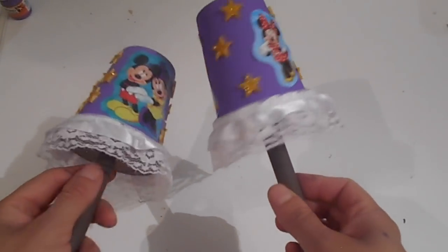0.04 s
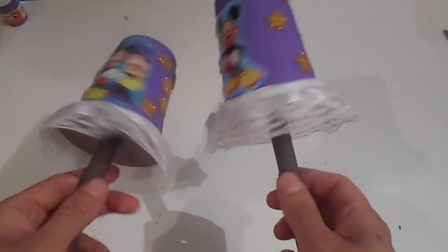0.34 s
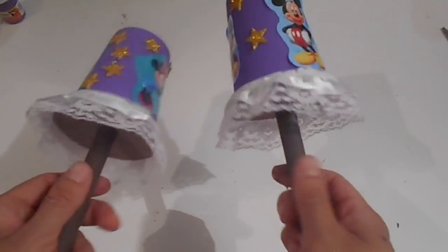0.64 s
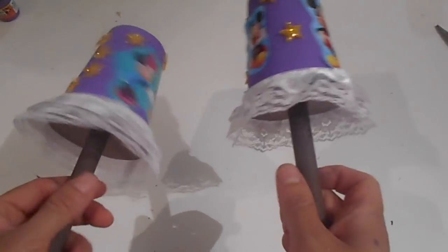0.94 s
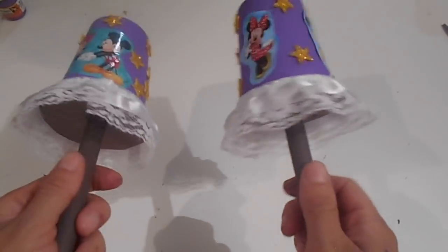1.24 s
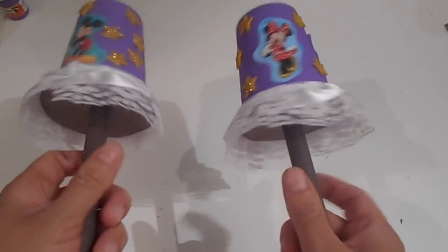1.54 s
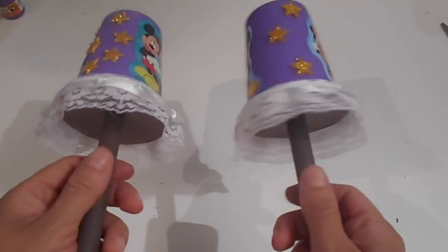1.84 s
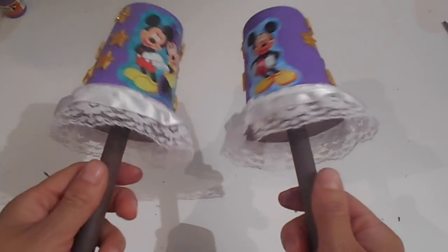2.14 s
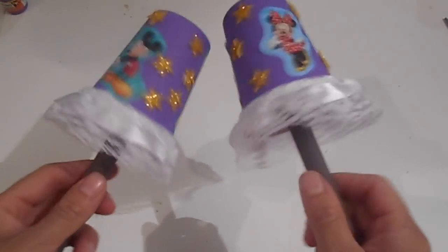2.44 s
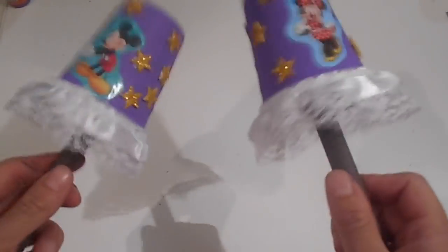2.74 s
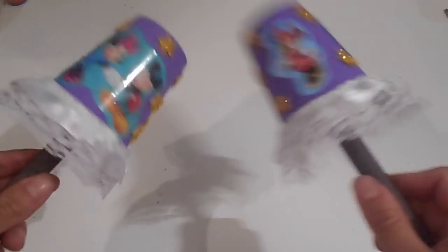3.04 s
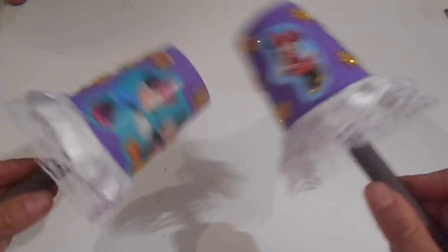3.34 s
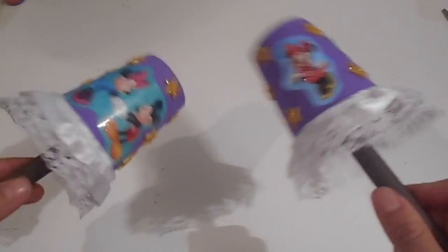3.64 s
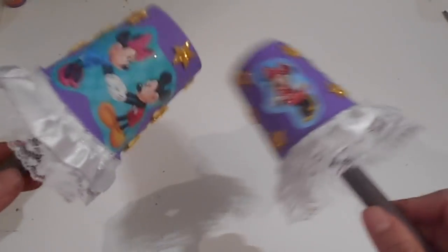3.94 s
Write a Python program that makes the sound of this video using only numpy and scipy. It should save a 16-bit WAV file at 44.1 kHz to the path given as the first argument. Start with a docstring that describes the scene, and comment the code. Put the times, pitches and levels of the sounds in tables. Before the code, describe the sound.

Two homemade maracas are turned close to the microphone, grains sliding and trickling inside the cups in uneven swishes with small hollow clacks. The sound thins briefly around 1 second and again around 2.3 seconds. At about 2.9 seconds a sharp knock starts harder shaking, and a quicker, louder rattle continues to about 4 seconds. The small, quiet room adds a short echo.

```python
"""Homemade maracas in a small room

Two cups on sticks, with loose grains inside, are played close to the microphone. Turned slowly at first,
the filling slides and trickles; from about 2.9 s they are shaken hard. Every grain ticks on the cup wall
and rings the air inside; single grains and clumps land with louder clacks. The room adds a short echo."""
import sys
import numpy as np
from scipy import signal
from scipy.fft import rfft, irfft
from scipy.io import wavfile
from scipy.ndimage import uniform_filter1d

SR = 44100
rng = np.random.default_rng(int(sys.argv[2]) if len(sys.argv) > 2 else 0)


def to_wav(s):
    """Save 16-bit WAV."""
    ch = np.atleast_2d(s).T  # columns
    pcm = np.round(np.clip(ch, -1, 1) * 32767)  # PCM
    wavfile.write(sys.argv[1], SR, pcm.astype(np.int16))


N = 176400
HZ = np.fft.rfftfreq(2048, 1 / SR)
HIT_LEN = len(HZ)  # samples in one impact
HIT_T = np.arange(HIT_LEN) / SR


def amp(db):
    """Decibels to gain."""
    return 10 ** (np.asarray(db) / 20)


def unit(x):
    """Scales each row to energy 1."""
    return x / np.sqrt(np.sum(x ** 2, -1, keepdims=True) + 1e-20)


def curve(points, hz):
    """Joins (Hz, value) points on a log-frequency axis."""
    point_hz, value = np.transpose(points)
    return np.interp(np.log(hz + 1), np.log(point_hz + 1), value)


def add(mix, start_s, sound):
    """Mixes a sound in at start_s, dropping what falls outside."""
    at = round(start_s * SR)
    sound = sound[max(-at, 0):]
    part = mix[max(at, 0):][:len(sound)]
    part += sound[:len(part)]


def causal(db):
    """Impulse response with the given gains on HZ and no ringing ahead."""
    log_gain = np.log(amp(np.r_[db, db[-2:0:-1]]))
    spectrum = np.exp(np.conj(signal.hilbert(log_gain)))
    return np.fft.ifft(spectrum).real[:HIT_LEN]


def ringing(modes):
    """One dying sine for each mode of a struck object."""
    return np.array([amp(db - 60 * HIT_T / t60) * np.sin(2 * np.pi * hz * HIT_T)
                     for hz, db, t60 in modes])


# The quiet room around the microphone. Each row: frequency in Hz, relative noise density in dB.
ROOM_TONE = [(20, -2.5), (50, -9.5), (85, -13.5), (120, -6.5), (165, 4.5), (230, -1), (400, -3.5),
             (550, -9.5), (1000, -5), (3000, -12.5), (7000, -13.5), (9500, -20), (10500, -64)]


def room_tone(rms_db=-56):
    """Faint steady noise behind the maracas."""
    colour = amp(curve(ROOM_TONE, np.fft.rfftfreq(N, 1 / SR)))
    noise = irfft(rfft(rng.standard_normal(N)) * colour, N)
    return amp(rms_db) * np.sqrt(N) * unit(noise)


# The colour of a grain on the cup, heard close up. Each row: frequency in Hz, relative gain in dB.
CUP_COLOUR = [(100, -45.5), (250, -37), (420, -18.5), (580, -19.5), (760, -10), (950, -3), (1400, -2),
              (1750, -2), (2650, -0.5), (3100, -5.5), (3500, -4), (4900, -2.5), (6600, -0.5), (7800, -3),
              (9100, -6.5), (9800, -15.5), (10500, -26.5)]
# The cup wall's modes. Each row: frequency in Hz, relative level in dB, seconds to fall 60 dB.
WALL_MODES = [(1065, -31, 0.014), (1444, -28.5, 0.033), (1687, -25, 0.046), (1980, -26.5, 0.028),
              (2270, -27, .025), (2690, -40, 0.016), (3500, -26, 0.026), (4230, -34.5, 0.02),
              (6170, -25, 0.02), (6750, -28.5, .012)]
CHATTER = amp(-18.5) * np.exp(-HIT_T / 0.01)  # the wall chatters briefly after each contact


def wall_ticks(count, contact_s=0.00025, ping_decay_cycles=3.46, ping_db=-7.5):
    """One tick for each spot on the wall: a sharp contact, its own mix of the modes and its own ping."""
    contact = rng.standard_normal((count, HIT_LEN)) * (np.exp(-HIT_T / contact_s) + CHATTER)
    ring = rng.standard_normal((count, len(WALL_MODES))) @ ringing(WALL_MODES)
    ping_hz = np.geomspace(945, 8710, count)
    cycles = ping_hz[:, None] * HIT_T
    ping = np.sin(2 * np.pi * cycles) * np.exp(-cycles / ping_decay_cycles)
    ticks = unit(contact + ring) + amp(ping_db) * unit(ping)
    return unit(signal.fftconvolve(ticks, causal(curve(CUP_COLOUR, HZ))[None], axes=1)[:, :HIT_LEN])


def cavity(sound, body_db, treble_db, air_hz, air_width_hz=125, air_db=2.5, body_trim_db=-3):
    """The air in the cup rings at a pitch that shifts with the filling; body and treble tint the blow."""
    body = curve([(650, 0), (950, 1), (1500, 1), (2700, 0)], HZ)
    treble = curve([(3400, 0), (6000, 1)], HZ)
    air = 1 / (1 + (2 * (HZ - air_hz) / air_width_hz) ** 2)
    colour_db = (body_db + body_trim_db) * body + treble_db * treble + air_db * air
    return signal.fftconvolve(sound, causal(colour_db))


def pop(hz, decay_s=0.0017):
    """One hollow pop: the air in the cup swells into its ring and dies within milliseconds."""
    return (HIT_T / decay_s) ** 2 * np.exp(-HIT_T / decay_s) * np.sin(2 * np.pi * hz * HIT_T)


def scattered_pops(swell, air_hz, chance, per_s=70, spread_oct=0.17, gain_db=6):
    """Heavier grains set the air in the cup popping around its own pitch."""
    out = np.zeros(len(swell) + HIT_LEN)
    count = int(len(swell) * per_s / SR)
    for k, (jitter, pitch, size) in enumerate(chance.random((count, 3))):
        at = int((k + jitter) * SR / per_s)
        hz = air_hz * 2 ** (spread_oct * (2 * pitch - 1))
        out[at:at + HIT_LEN] += amp(gain_db) * swell[at] * size * pop(hz)
    return out


def shower(ticks, t, swell, air_hz, shaken, usual_db=-28, crowding=0.6, bunch_hz=91, bunch_db=1.58):
    """Grains rain on the wall in bunches: fine and dense when sliding, coarser when shaken."""
    usual_per_s, spread_db, trim_db = (650, 3, 0.5) if shaken else (1700, 5.5, -0.5)
    chance = np.random.default_rng(rng.integers(2 ** 31))
    rate = usual_per_s / SR * (swell / amp(usual_db)) ** crowding  # louder surges hold more impacts
    due = np.cumsum(rate)
    bunches = chance.standard_normal(size=80)
    jitter, weight, spot = chance.random((int(due[-1]) + 1, 3)).T
    turn = np.arange(len(jitter)) + 2 * jitter - 1
    hits = np.minimum(np.searchsorted(due, turn), len(t) - 1)
    size = amp(spread_db * np.sqrt(12) * weight)
    size *= amp(bunch_db * np.interp(t[hits] * bunch_hz, np.arange(-40, 40), bunches))
    size *= swell[hits] / np.sqrt(rate[hits] * np.mean(size ** 2))  # together they follow the swell
    out = scattered_pops(swell, air_hz, chance)
    for at, strength, k in zip(hits, size, (spot * len(ticks)).astype(int)):
        out[at:at + HIT_LEN] += strength * ticks[k]
    return amp(trim_db) * out


# The filling surges against the wall, close to the microphone. Each row: peak time, rise and fall in
# seconds, relative level, hollow body and treble in dB, air resonance in Hz.
FILLING_SURGES = [(0.003, 0.06, 0.056, -39.5, -0.5, 3, 1070), (0.112, 0.11, 0.026, -32.5, 1.5, -1.5, 1150),
                  (0.187, 0.048, 0.065, -39, -3, -1.5, 1200), (0.29, 0.023, 0.034, -38, 6.5, -3.5, 1220),
                  (0.36, 0.059, 0.094, -32, 0, -5, 1320), (0.513, 0.06, 0.09, -32, 4, -5, 1265),
                  (0.63, 0.11, 0.039, -27, 1.5, -2.5, 1096), (0.685, 0.026, 0.04, -31.5, 6, -6, 1080),
                  (0.74, 0.031, 0.056, -34, 4, -8.5, 1130), (0.79, 0.014, 0.031, -37.5, 1.5, -6, 1120),
                  (1.154, 0.062, 0.049, -28.5, 4.5, -4, 1080), (1.199, 0.03, 0.1, -28, 4, -4.5, 1080),
                  (1.327, 0.044, 0.071, -29, 6, -5, 1310), (1.429, 0.019, 0.04, -36, 0.5, -1.5, 1410),
                  (1.527, 0.076, 0.053, -38, -2.5, -3.5, 1450), (1.689, 0.059, 0.04, -32.5, 1.5, -3, 1210),
                  (1.82, 0.023, 0.084, -40.5, 5.5, -1.5, 1550), (1.94, 0.052, 0.031, -29.5, 6, -3, 1363),
                  (1.995, 0.019, 0.079, -26.5, 2.5, -2, 1200), (2.1, 0.047, 0.11, -40, 0.5, -3, 1056),
                  (2.499, 0.042, 0.04, -28.5, 0.5, -7, 1260), (2.544, 0.03, 0.055, -34, 6.5, 0.5, 1304),
                  (2.678, 0.059, 0.066, -25.5, 0, -0.5, 1286), (2.907, 0.0087, 0.009, -26, 3, -2, 1420),
                  (2.959, 0.025, 0.058, -18.5, -1, 1, 982), (3.092, 0.013, 0.042, -29, 2, -2, 1450),
                  (3.14, 0.035, 0.035, -27.5, -4.5, 3, 1220), (3.202, 0.04, 0.02, -21.5, -1.5, 3, 944),
                  (3.245, 0.025, 0.02, -32, 3.5, -2.5, 1000), (3.295, 0.028, 0.048, -26.5, -0.5, 1.5, 1056),
                  (3.393, 0.04, 0.05, -25.5, -1, 1.5, 1000), (3.449, 0.014, 0.025, -38, 3, -10, 990),
                  (3.525, 0.059, 0.047, -32, 0.5, 1.5, 974), (3.604, 0.059, 0.044, -25, 0, 0, 1430),
                  (3.705, 0.023, 0.043, -35, 3.5, 1.5, 1016), (3.78, 0.085, 0.059, -27, -1.5, 0.5, 1000),
                  (3.885, 0.021, 0.041, -31, -2.5, -1.5, 1140), (3.94, 0.041, 0.066, -25.5, -2.5, 2, 1300),
                  (3.996, 0.022, 0.036, -27, -1, -5, 1130)]


def surges(shake_from_s=2.85, drop_db=12, roundness=1.5):
    """Each turn or shake sends a shower of grains that swells and thins."""
    out, ticks = np.zeros(N), wall_ticks(count=300)
    for peak_s, rise_s, fall_s, level_db, body_db, treble_db, air_hz in FILLING_SURGES:
        t = np.arange(-2 * rise_s, 2 * fall_s, 1 / SR)
        swell = amp(level_db - drop_db * np.maximum(-t / rise_s, t / fall_s) ** roundness)
        grains = shower(ticks, t, swell, air_hz, shaken=peak_s > shake_from_s)
        add(out, peak_s + t[0], cavity(grains, body_db, treble_db, air_hz))
    return out


def clack(rise_s=0.00022, decay_s=0.0013, ripple_db=3.5, ripple_width_hz=447.4):
    """A clump of grains lands at once: a short burst that rings the wall, coloured by the spot it hits."""
    fade = (1 - np.exp(-HIT_T / rise_s)) * (np.exp(-HIT_T / decay_s) + CHATTER)
    burst = rng.standard_normal(HIT_LEN) * fade
    for _ in range(3):  # even out the spectrum, then restore the fade
        burst = irfft(np.exp(1j * np.angle(rfft(burst))), HIT_LEN)
        burst *= fade / np.sqrt(abs(uniform_filter1d(burst ** 2, size=40)) + 1e-12)
    ring = sum(rng.choice([-1, 1]) * mode for mode in ringing(WALL_MODES))
    ripple = np.diff(rng.standard_normal(size=80)) / np.sqrt(2)
    spot_db = ripple_db * np.interp(HZ / ripple_width_hz, np.arange(len(ripple)), ripple)
    return unit(signal.fftconvolve(burst + ring, causal(curve(CUP_COLOUR, HZ) + spot_db)))


# Hard landings that stand out at close range. Each row: start in seconds, relative level, hollow body
# and treble in dB, air resonance in Hz.
HARD_LANDINGS = [(0.036, -37.5, 8, 5, 1066), (0.1754, -26.5, -10, 3.5, 1210),
                 (0.1861, -24, -3.5, -12, 1180), (0.224, -45.5, 9, 3, 1450), (0.325, -37, 12, -14, 1320),
                 (0.3512, -32.5, 9, -24, 1350), (0.4651, -27.5, 1.5, -9.5, 1280),
                 (0.492, -24.5, -17, -12, 1010), (0.506, -34, 7, -14, 1100), (0.611, -25.5, -2, -11, 1200),
                 (0.6335, -22, -1.5, -8, 1400), (0.676, -30.5, 9, -8, 1060),
                 (0.6804, -20.5, -3, -9.5, 1050), (0.7102, -26.5, -22, -2.5, 1240),
                 (0.7227, -26.5, 8.5, -10, 1110), (0.7556, -25.5, -4, -6, 1080), (0.7826, -29, 6, -9, 1155),
                 (0.889, -34.5, 6, -3.5, 1576), (0.907, -36.5, -4, 0, 1430), (1.064, -53, -2, -14, 1200),
                 (1.153, -45, 10, -30, 1094), (1.2944, -22.5, 10, -6, 984), (1.3174, -27, 9.5, -10, 960),
                 (1.3349, -21.5, 8, 0.5, 1360), (1.4152, -29, 11, -4, 1480), (1.427, -24.5, -1, 4, 1083),
                 (1.4644, -40, 7, 8, 1180), (1.4958, -35.5, 5, -1, 1470), (1.5261, -32.5, 14.5, -29, 1470),
                 (1.5435, -43.5, 16, 8, 1420), (1.5862, -48.5, 13, 7, 1430), (1.817, -32, -7, -12, 1400),
                 (1.826, -29.5, 0, -7, 1370), (1.912, -29, 6, -21, 1340), (1.9479, -26.5, -18, -1, 1340),
                 (1.9762, -24, 1, -6, 1260), (2.0252, -31, 4, 9.5, 1200),
                 (2.0762, -24.5, -12.5, -7.5, 1490), (2.0902, -23, -14, -13, 1040),
                 (2.1592, -33.5, -13, -1, 1150), (2.2026, -28, -13, -10.5, 1460),
                 (2.2167, -34, 5.5, -6, 1080), (2.4896, -28, 6.5, -19, 1230), (2.508, -29.5, -6, -4, 1250),
                 (2.6293, -32, -12, 0, 1480), (2.6613, -30, 2, 8.5, 1420), (2.682, -26, 4, 4, 1184),
                 (2.7505, -26, -8, -11, 1480), (2.7723, -33, -10, -5, 1080), (2.7883, -31, 5, -13, 1220),
                 (2.8735, -33.5, -3, -10, 1480), (2.9022, -23, 2, 2, 1430), (2.9398, -21.5, -18, 6.5, 1240),
                 (3.0284, -22.5, -0.5, -7, 1030), (3.0746, -24.5, -18, -10.5, 1260),
                 (3.0997, -23, -8, -1, 1390), (3.1044, -22, -23, -1, 1460), (3.124, -27.5, -13, 4, 1090),
                 (3.1684, -25, -13, 3, 950), (3.211, -28.5, 9, -16, 1010), (3.229, -30.5, 4.5, -7, 1120),
                 (3.243, -30, 4, -9, 1260), (3.2678, -21, -17, -2.5, 1110), (3.2749, -22.5, -4, 0, 1280),
                 (3.278, -32.5, -3, 14.5, 1030), (3.3296, -30, 2, 3, 1470), (3.3625, -35, -4.5, 3, 1090),
                 (3.461, -27, -18, -2.5, 1180), (3.476, -32, -9, -1, 1200), (3.4924, -28.5, 2.5, 6.5, 1490),
                 (3.564, -22.5, -18, -1.5, 1290), (3.617, -29, 2, 7.5, 1100), (3.6852, -25, -17, -2, 1060),
                 (3.8703, -21, -10, -9.5, 1370)]


def landings(gain_db=24, pop_db=-15):
    """Single clacks among the surges, each with its hollow pop."""
    out = np.zeros(N)
    for start_s, level_db, body_db, treble_db, air_hz in HARD_LANDINGS:
        landing = clack()[:HIT_LEN] + amp(pop_db) * unit(pop(air_hz))
        add(out, start_s, amp(level_db + gain_db) * cavity(landing, body_db, treble_db, air_hz))
    return out


# Knocks on the cup as the shaking begins. Each row: start in seconds, relative level and treble in dB.
CUP_KNOCKS = [(2.8833, 4, -9), (2.8901, -1, -7), (2.896, 7, 0.5)]
# What the knocks ring with. Each row: frequency in Hz, relative level in dB, seconds to fall 60 dB.
KNOCK_RING = [(1410, -16, 0.018), (2980, -6.5, 0.0088), (3560, -4, 0.014), (4500, -5, 0.011),
              (5200, -4, .008), (6520, -2, .011), (7450, -9, 0.022), (9600, -13, 0.01)]
# Dull jolts of the handle. Each row: start in seconds, level in dB.
HANDLE_JOLTS = [(2.896, -40), (2.955, -36.5)]


def jerk(grit_db=-8, jolt_s=0.0018):
    """The jerk that starts the shaking knocks something hard against the cup and jolts the handle."""
    out = np.zeros(N)
    ring = unit(sum((-1) ** k * mode for k, mode in enumerate(ringing(KNOCK_RING))))
    for start_s, level_db, treble_db in CUP_KNOCKS:
        knock = ring + amp(grit_db) * clack()[:HIT_LEN]
        add(out, start_s, amp(level_db) * cavity(knock, 0, treble_db, air_hz=KNOCK_RING[0][0]))
    for start_s, level_db in HANDLE_JOLTS:
        add(out, start_s, amp(level_db) * (1 - HIT_T / jolt_s) * np.exp(-HIT_T / jolt_s))
    return out


# How fast the small room dies away. Each row: frequency in Hz, seconds to fall 60 dB.
ROOM_DECAY = [(300, 0.47), (1500, 0.3), (5000, 0.24), (10000, .22)]


def room_echo(direct, echoes_per_s=900, early_db=-24, tail_db=-15.5):
    """Early echoes off the table and walls reach the microphone, then a short diffuse tail."""
    t = np.arange(SR // 2) / SR
    early = rng.standard_normal(len(t)) * (rng.random(len(t)) < echoes_per_s / SR)
    early *= (t > 0.002) & (t < 0.018)
    diffuse = rng.standard_normal(len(t)) * (t > 0.006)
    hz, frame_s, spectra = signal.stft(diffuse, SR, nperseg=256)
    decay = amp(-60 * frame_s / curve(ROOM_DECAY, hz)[:, None])
    tail = signal.istft(spectra * decay, SR, nperseg=256)[1][:len(t)]
    return signal.fftconvolve(direct, amp(early_db) * unit(early) + amp(tail_db) * unit(tail))[:N]


def scene():
    """The maracas close by, with the small room behind them, in mono."""
    maracas = surges() + landings() + jerk()
    return (maracas + room_echo(maracas) + room_tone())[None]


def record(dry):
    """The microphone passes little above 10 kHz."""
    lowpass = signal.firwin(161, cutoff=10150, window=("kaiser", 7), fs=SR)
    return signal.oaconvolve(dry, lowpass[None], "same")


dry = scene()
out = record(dry)
to_wav(out)
```